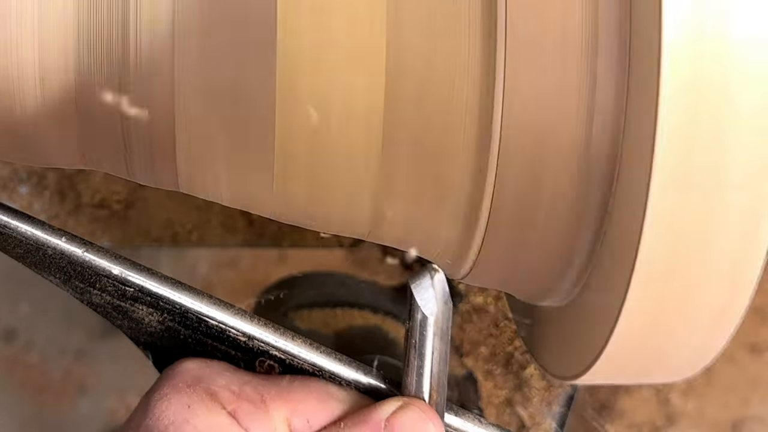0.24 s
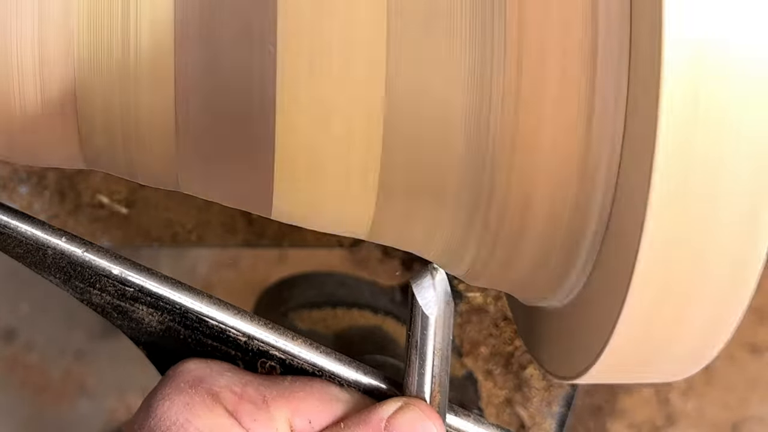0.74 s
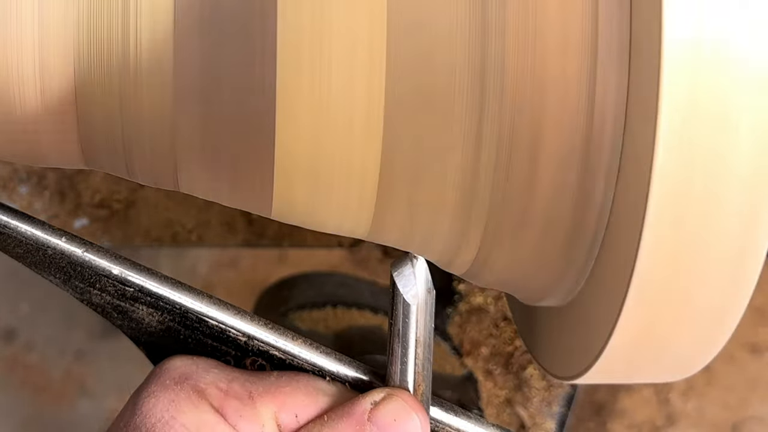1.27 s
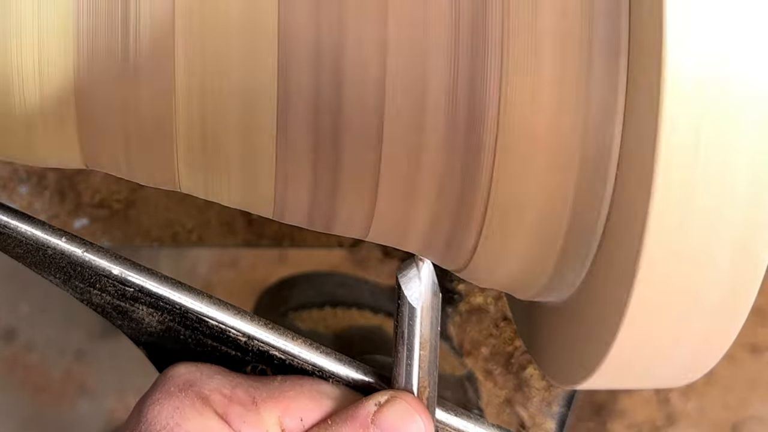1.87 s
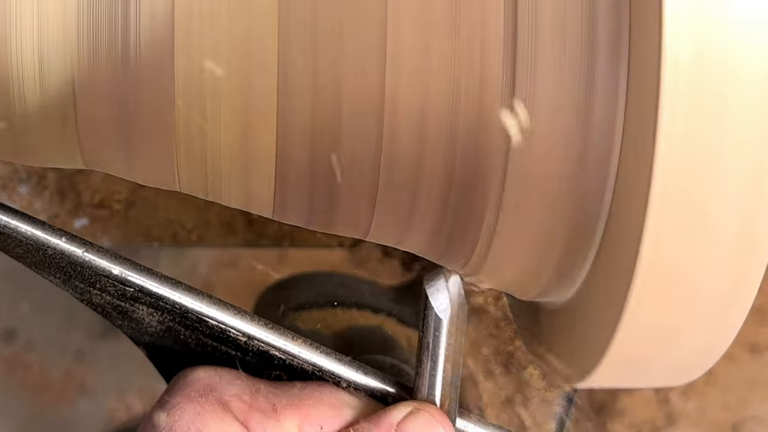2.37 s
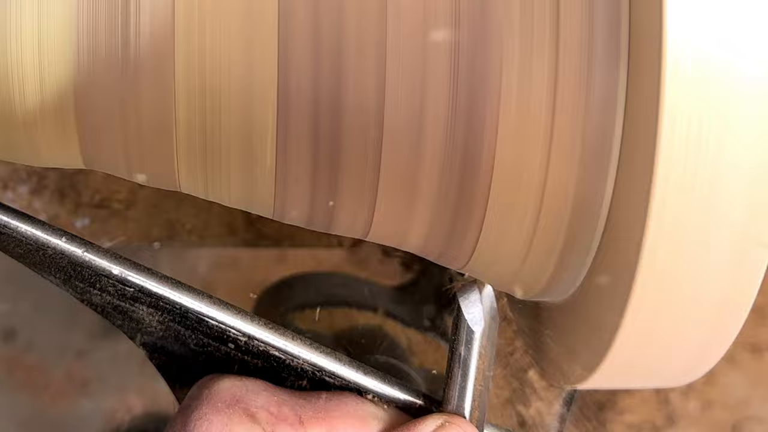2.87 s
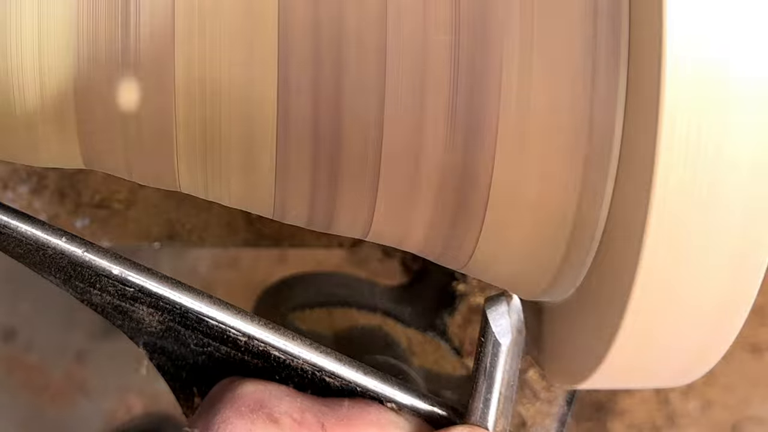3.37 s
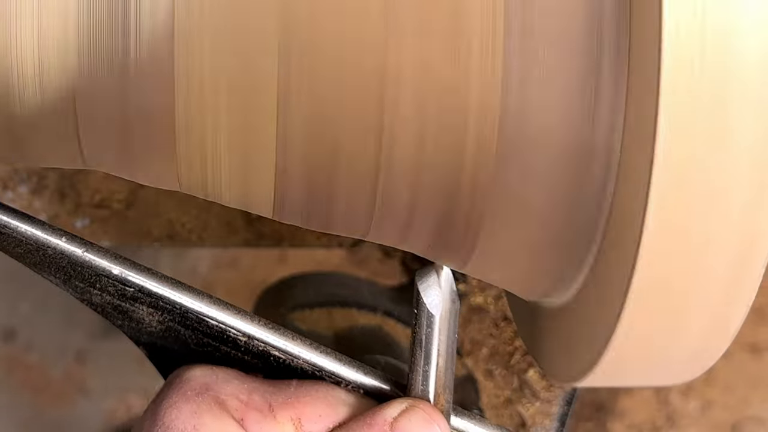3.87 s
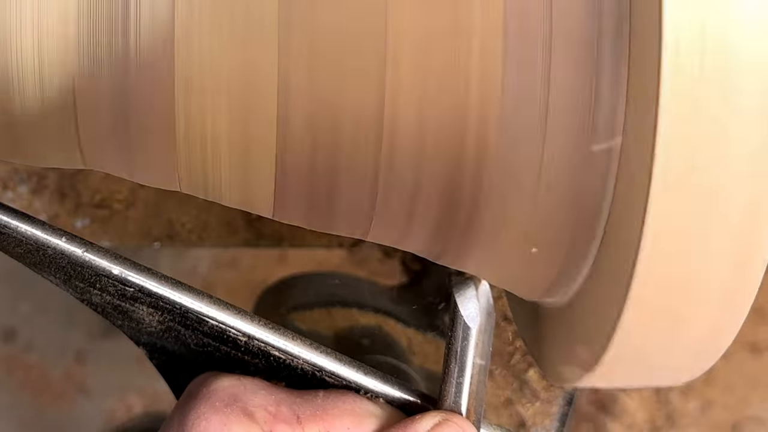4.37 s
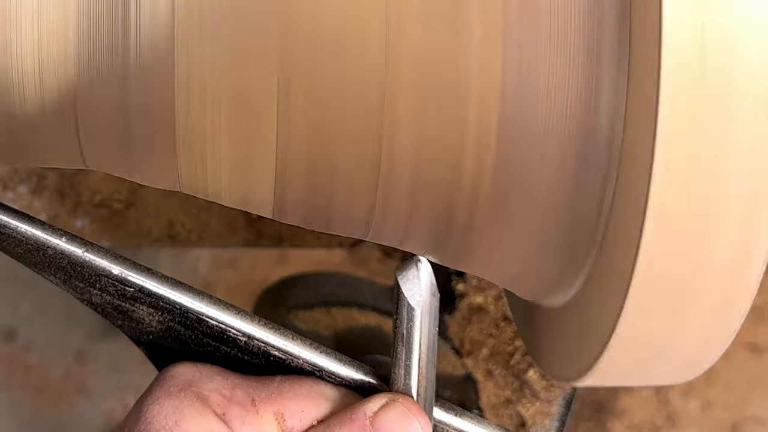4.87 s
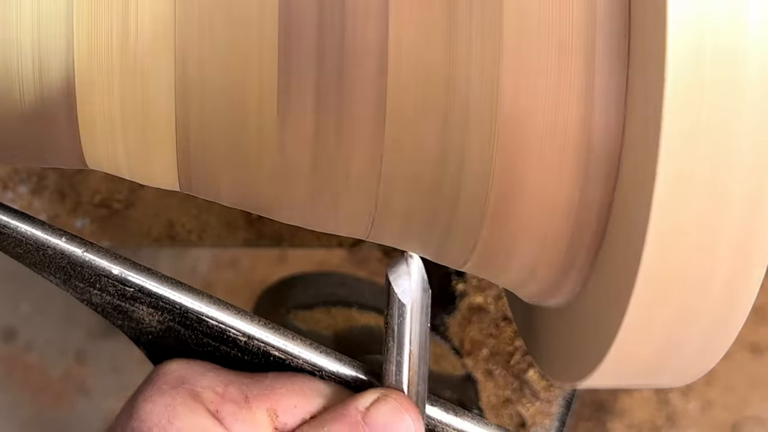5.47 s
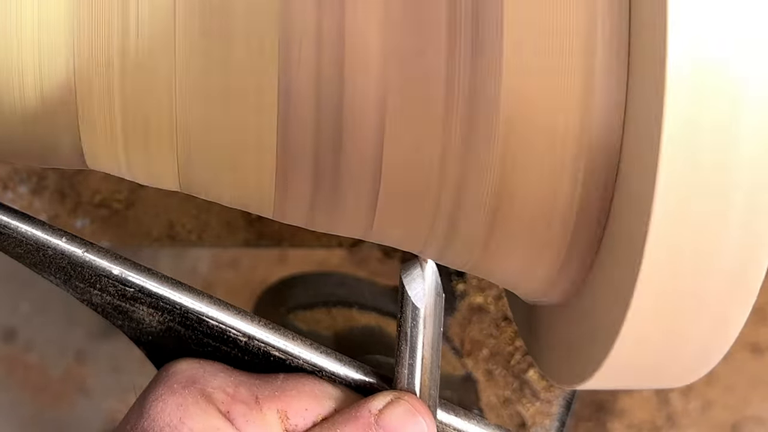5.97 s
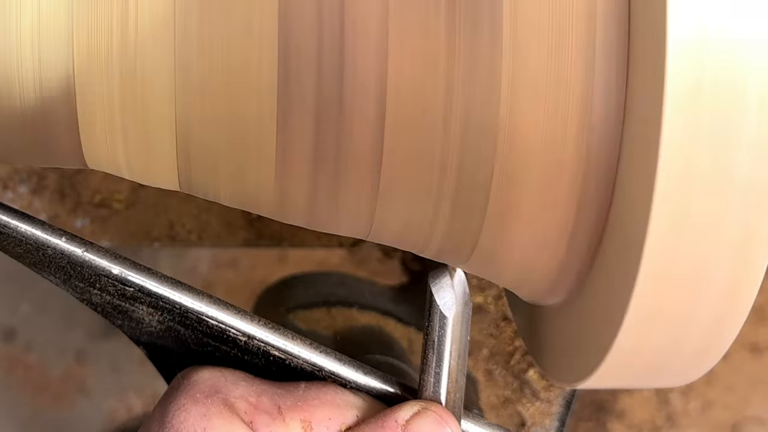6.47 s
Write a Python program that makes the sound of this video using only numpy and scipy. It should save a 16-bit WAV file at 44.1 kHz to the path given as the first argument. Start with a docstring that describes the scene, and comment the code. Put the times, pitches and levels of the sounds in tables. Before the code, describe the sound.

Close, dry woodturning: short scraping bursts, then longer buzzing cuts over a low lathe hum, with occasional steel knocks and brief chatter.

```python
"""A lathe idles close by: headstock rumble, bearing hiss (shaped noise) and thin drive whine (wavering sines).
A gouge then takes light passes, short and long, over a wooden bowl blank, the lathe alone between them.
Each pass lands with a jolt, leans in and lifts; random fibre snaps hiss and ring the blank's resonances.
The cut throbs with every turn of high side and end grain, chatters at times, and a glue seam ticks.
Now and then the steel shaft knocks and rings; the last pass is still cutting at the end."""
import sys
import numpy as np
from scipy import signal
from scipy.fft import rfft, irfft
from scipy.io import wavfile

SR = 44100
rng = np.random.default_rng(int(sys.argv[2]) if len(sys.argv) > 2 else 0)


def unload_audio(sound):
    """Save the sound as a 16-bit wav file, at the path given as the first command line argument."""
    columns = np.transpose(np.atleast_2d(sound))
    # keep every value between -1 and 1, then stretch to whole-number steps
    steps = np.round(np.clip(columns, -1, 1) * 32767)
    wavfile.write(sys.argv[1], SR, steps.astype(np.int16))


N = 297234
TIME = np.arange(N) / SR
BINS_HZ = np.fft.rfftfreq(4096, 1 / SR)


def undb(db):
    """Decibels to gain."""
    return 10 ** (np.asarray(db) / 20)


def unit(x):
    """Scale to rms 1."""
    return x / np.std(x)


def walk(rate):
    """Smooth random curve: about `rate` swings/s, spread 1."""
    count = 8192
    hz = np.fft.rfftfreq(count, TIME[-1] / count)
    spectrum = rfft(rng.standard_normal(count)) / (1 + (hz / rate) ** 4)
    slow = unit(irfft(spectrum))
    return np.interp(TIME, np.linspace(0, TIME[-1], count), slow)


def curves(table):
    """Columns of a (t/s, values ..) table at every sample."""
    s, *columns = np.transpose(table)
    return [np.interp(TIME, s, column) for column in columns]


def slope(points):
    """Gain in dB at every bin, from (f/Hz, gain/dB) points on a log frequency axis."""
    hz, db = np.transpose(points)
    return np.interp(np.log(BINS_HZ + 1), np.log(hz), db)


def response(db):
    """Minimum-phase impulse response with this gain in dB, by folding the cepstrum."""
    cepstrum = irfft(db * np.log(10) / 20)
    half = len(cepstrum) // 2
    cepstrum[1:half] *= 2
    cepstrum[half + 1:] = 0
    return irfft(np.exp(rfft(cepstrum)))


def ring(x, h):
    """Convolve with an impulse response scaled to unit energy."""
    return signal.fftconvolve(x, h / np.linalg.norm(h))[:N]


def band(x, low_hz, high_hz):
    """Band-pass with moderately steep edges, kept below Nyquist."""
    edges_hz = [low_hz, min(high_hz, SR / 2 - 100)]
    return signal.sosfilt(signal.butter(3, edges_hz, "band", fs=SR, output="sos"), x)


# slow swell of the rumble: t/s, level/dB
RUMBLE_SWELL = [(0, -48), (1.4, -48), (3, -49.5), (4.7, -49.5), (5.5, -47.5), (6.74, -48)]
# headstock rumble spectrum: f/Hz, relative gain/dB
RUMBLE_SPECTRUM = [(20, -18), (45, -10), (85, -8), (140, -2), (205, 0.5), (250, -1.5), (300, 0),
                   (420, -8.5), (520, -7), (640, -13), (740, -13.5), (880, -18), (1500, -48)]
# bearing hiss spectrum: f/Hz, relative gain/dB
BEARING_SPECTRUM = [(500, -21.5), (900, -6.5), (1100, -1), (1650, -4), (2400, -11.5), (3900, -14.5),
                    (4800, -20), (5500, -17.5), (7800, -21), (10000, -31), (15000, -37)]
# motor drive whine: f/Hz, peak level/dB
DRIVE_WHINE = [(10799, -83), (11230, -89), (11531, -94)]


def lathe(bearings_db):
    """Shaped noise for lumpy headstock rumble and restless bearings; sines of wandering pitch for the drive."""
    rumble_db = curves(RUMBLE_SWELL)[0] + 1.18 * walk(rate=21)
    rumble = ring(rng.standard_normal(N), response(slope(RUMBLE_SPECTRUM))) * undb(rumble_db)
    hiss_db = bearings_db + 1.3 * walk(rate=25)
    bearings = ring(rng.standard_normal(N), response(slope(BEARING_SPECTRUM))) * undb(hiss_db)
    whine = np.zeros(N)
    for hz, db in DRIVE_WHINE:
        turns = np.cumsum(hz + 22 * walk(rate=40)) / SR
        whine += undb(db) * np.sin(2 * np.pi * turns)
    return rumble + bearings + whine


def workshop(x, t60_s, wet_db):
    """Adds a faint, short, dull echo from bench and walls: decaying, low-passed noise."""
    t = TIME[:SR // 2]
    gap_s = .004
    tail = rng.standard_normal(len(t)) * undb(-60 * t / t60_s) * (t > gap_s)
    tail = signal.sosfilt(signal.butter(1, 6000, fs=SR, output="sos"), tail)
    return x + undb(wet_db) * ring(x, tail)


# steel knocking against wood: t/s, level of the scrape/dB
SHAFT_KNOCKS = [(.314, -41), (0.828, -33), (0.845, -28), (1.317, -36.5), (3.695, -48), (5.765, -38)]


def knocks(ring_hz, width_hz, decay_s):
    """Each knock is a decaying noise scrape that rings the steel shaft of the gouge."""
    push = np.zeros(N)
    for s, db in SHAFT_KNOCKS:
        push += undb(db) * (TIME >= s) * np.exp(-np.abs(TIME - s) / decay_s)
    shaft_db = -10 * np.log10(1 + (2 * (BINS_HZ - ring_hz) / width_hz) ** 2)
    return ring(push * rng.standard_normal(N), response(shaft_db))


def fibres(per_second, spread_db, rub_db, flutter_db):
    """Fibres snap at random over the smooth rub of the bevel, in flurries as the shaving curls and breaks."""
    snaps = (rng.random(N) < per_second / SR) * rng.standard_normal(N)
    size = undb(spread_db * np.minimum(rng.exponential(size=N), 5))
    rub = undb(rub_db) * rng.standard_normal(N)
    grain = unit(unit(snaps * size) + rub)
    return grain * undb(flutter_db * walk(rate=105))


def seam(turns, tick_db):
    """A hard glue seam in the blank knocks the edge as each turn completes: band-passed clicks."""
    hits = np.flatnonzero(np.diff(np.floor(turns)) > 0)
    ticks = np.zeros(N)
    ticks[hits] = undb(tick_db)
    return band(ticks, 930, 1800)


def boost(x, hz, width_hz, db):
    """Raise or lower one resonance by a level that may move in time."""
    return x + (undb(db) - 1) * signal.lfilter(*signal.iirpeak(hz, hz / width_hz, fs=SR), x)


# blank, gouge and tool rest, with fine ripples from near reflections off the bench above 6.8 kHz: f/Hz,
# width/Hz, mean gain/dB
BODY_RESONANCES = [(990, 95, 3), (1466, 91, -1), (1650, 64, 0.5), (1860, 22, 4.5), (2117, 80, 4.5),
                   (2268, 42, 5), (2490, 48, 2.5), (2857, 78, 2.5), (2773, 100, 6), (3305, 100, 4.5),
                   (4430, 140, 2.5), (4770, 330, -0.5), (5860, 67, 6), (6890, 160, 3.5), (7980, 164, 6),
                   (8410, 140, 4), (9070, 160, 2.5), (11630, 300, 3.5)]
# blank low, blank upper, gouge shaft: f/Hz, width/Hz
GRIPPED_MODES = [(1395, 250), (1740, 77), (4740, 230)]


def resonate(x, modes_db, wander_db, grip_db):
    """Resonances are fed more or less strongly as the point of contact wanders and the grip changes."""
    for hz, width_hz, db in BODY_RESONANCES:
        x = boost(x, hz, width_hz, db + wander_db * walk(rate=20))
    for (hz, width_hz), db in zip(GRIPPED_MODES, modes_db):
        x = boost(x, hz, width_hz, db + grip_db * walk(rate=7.2))
    return x


# depth of the steady throb and how much it wavers, before the weights of its harmonics
THROB_DB, THROB_WAVER_DB = 0.8, 1
# bouncing bouts: worst at t/s, build-up/s, extra throb/dB, extra bite/dB
CHATTER_BOUTS = [(.261, 0.022, 4.5, 8), (.316, 0.029, 5, 1.5), (0.363, 0.066, 0.5, 8),
                 (.765, 0.061, 3, 7.5), (.84, 0.056, 3.5, 3.5), (1.45, 0.022, 2.5, 9.5),
                 (1.585, 0.06, 2.5, 0), (2.24, 0.12, 2, 3.5), (3.5, 0.084, 2.5, 1)]
CHATTER_SETTLES_S = 0.057


def chatter():
    """Bouncing builds up and settles, deepening throb and bite; returns both in dB."""
    throb_db = THROB_DB + THROB_WAVER_DB * walk(rate=3.1)
    dig_db = np.zeros(N)
    for s, build_s, bounce_db, bite_db in CHATTER_BOUTS:
        swell = np.interp(TIME, [s - build_s, s, s + CHATTER_SETTLES_S], [0, 1, 0])
        throb_db += bounce_db * np.sqrt(swell)
        dig_db += bite_db * swell
    return throb_db, dig_db


# passes: touch/s, lift/s, release/s, full level/dB before feed, lighter at touch by/dB,
# lean-in time constant/s, gain of the blank's low mode/dB
GOUGE_PASSES = [(0.248, 0.479, 0.047, -36.5, 10.5, 0.05, -0.5), (0.726, 1.085, 0.039, -37, 11, 0.057, 1),
                (1.316, 1.59, 0.037, -36, 14, 0.1, 5.5), (1.813, 3.509, 0.022, -35.5, 11, 0.078, 1.9),
                (3.696, 3.699, .07, -43.5, 1, .05, 0), (3.753, 4.655, .039, -39, 13.5, 0.036, 3.5),
                (5.01, 5.258, 0.083, -36.5, 11, 0.15, 3), (5.544, 5.631, 0.031, -46, 0.5, 0.1, 6.5),
                (5.768, 6.8, .03, -37.5, 5, 0.085, 1)]
# hand feed, one list per long pass: t/s, extra level/dB, extra bite/dB
HAND_FEED = [
    [(2.33, -2, 0), (2.48, 1, -.5), (2.63, 0.1, -5.5), (2.68, 1.5, 1.5), (2.88, 0.3, 0.5), (3.02, -3.2, 0),
     (3.25, -4, -2.3), (3.48, -7, -5.5)],
    [(3.9, .6, -0.5), (4.03, -0.6, -1.1), (4.29, 1.15, -0.5), (4.4, 1.5, 2), (4.5, 2.5, -0.3),
     (4.66, 3, -5)],
    [(5.9, 0.5, -1.1), (6.1, 0.5, 2), (6.28, 0.9, 0), (6.4, 0.5, -3.5), (6.74, 0.6, 0)],
]
# upper blank mode, shaft: gain free at touch/dB, gain bedded in/dB
MODE_BEDDING = [(1.8, -9.5), (5, -3.5)]
BEDDING_S = 1
# level falls by CLEAR_DB within CONTACT_S before touch, and within the release time after lift
CONTACT_S, CLEAR_DB = 0.0087, 32
JOLT_DB, JOLT_S = 3.5, .008
# bite: body of the wood over the hiss, growing with level
BITE_DB, BITE_AT_LEVEL_DB, BITE_DB_PER_DB = 0.86, -37.5, 0.58
# at first only the edge scrapes, with less bite
SCRAPE_DB, SCRAPE_S = 2, 0.07


def passes():
    """Passes land, lean in, follow the feed and lift ever faster; returns level, bite, main mode gains in dB."""
    gain, bite_db, low_db, age_s = np.zeros((4, N))
    for touch, lift, release_s, full_db, light_db, lean_s, mode_db in GOUGE_PASSES:
        since = np.maximum(TIME - touch, 0)
        level_db = full_db - light_db * np.exp(-since / lean_s)
        deeper_db = 0
        for feed in HAND_FEED:
            if touch < feed[0][0] < lift:
                extra_db, deeper_db = curves(feed)
                level_db = level_db + extra_db
        approach = np.maximum(touch - TIME, 0) / CONTACT_S
        departure = (np.maximum(TIME - lift, 0) / release_s) ** 2
        jolt_db = JOLT_DB * np.exp(-since / JOLT_S)
        gain += undb(level_db + jolt_db - CLEAR_DB * (approach + departure))

        pass_bite_db = BITE_DB + BITE_DB_PER_DB * (level_db - BITE_AT_LEVEL_DB) + deeper_db
        pass_bite_db = pass_bite_db - SCRAPE_DB * np.exp(-since / SCRAPE_S)
        begun = TIME > touch - CONTACT_S
        bite_db[begun] = pass_bite_db[begun]
        low_db[begun] = mode_db
        age_s[begun] = since[begun]
    free = np.exp(-age_s / BEDDING_S)
    upper_db = [bedded_db + (free_db - bedded_db) * free for free_db, bedded_db in MODE_BEDDING]
    return 20 * np.log10(gain + 1e-6), bite_db, [low_db, *upper_db]


# spindle speed, sagging under load: t/s, turns per second
SPINDLE_SPEED = [(0, 54.35), (2.8, 54.3), (3.05, 55.6), (3.4, 54.6), (4.1, 54.2), (4.35, 52.4), (4.7, 55),
                 (5.2, 54.6), (5.8, 54), (6.74, 53.7)]
HIGH_SIDE_TURNS = .18
# wood body, chips, scraping edge, fine dust: low f/Hz, high f/Hz, snaps per second, relative level/dB,
# share of the bite, flutter/dB, end grain swing/dB (before the riding factor)
CUT_PARTS = [(203, 2210, 1500, 0.87, 1.0, 1.0, 8.5), (2267, 3470, 2100, -0.5, 0.78, 1.5, 3),
             (3620, 6630, 7000, 0, 0.51, 1.45, 3.5), (6560, 24700, 13000, 1.5, 0.032, 0.5, 2)]
# broad colour of the cut: f/Hz, relative gain/dB
SHAVING_COLOUR = [(300, -33.5), (650, -17), (900, -10), (1170, -9.5), (1350, 0.5), (1800, 1), (2400, -3),
                  (3600, -5.5), (4700, -3), (6500, -9.5), (9000, -12), (10500, -14), (12700, -16.5),
                  (14300, -15.5)]
# narrow dips and bumps in the colour of the cut: f/Hz, width/Hz, gain/dB
COLOUR_DETAILS = [(1530, 94, -4), (2655, 190, -3), (2840, 120, 0.5), (7700, 160, 3)]
# uneven tearing of the shaving shakes the whole cut
TEARING_DB, TEARING_SWINGS_PER_S = .4, 75


def cutting(end_grain_turns, bounce_db):
    """Fibres snap under the gouge, pressed once a turn by the high side and once by the end grain."""
    level_db, bite_db, modes_db = passes()
    throb_db, dig_db = chatter()
    bite_db = bite_db + dig_db
    turns = np.cumsum(curves(SPINDLE_SPEED)[0]) / SR - HIGH_SIDE_TURNS
    angle = 2 * np.pi * turns
    high_side = 1.16 * np.cos(angle) + 0.24 * np.cos(2 * angle)
    press_db = level_db + throb_db * high_side + 0.25 * np.cos(2 * angle)
    press_db = press_db + TEARING_DB * walk(rate=TEARING_SWINGS_PER_S)

    # end grain and seam drum on the wood and lift the hiss a little, unless the gouge bounces clear
    riding = np.clip(0.5 - (throb_db / bounce_db) ** 2, 0, 1)
    end_grain = riding * np.cos(angle - 2 * np.pi * end_grain_turns)
    seam_turns = turns - end_grain_turns + .04 * walk(rate=16)
    force = seam(seam_turns, tick_db=18.0) * riding * undb(level_db + 0.63 * bite_db)

    # a deeper bite shakes the body of the wood, a light touch mostly hisses
    for low_hz, high_hz, per_second, db, share, flutter_db, swing_db in CUT_PARTS:
        grain = fibres(per_second, spread_db=-2.2, rub_db=4.5, flutter_db=flutter_db)
        part_db = db + press_db + share * bite_db + swing_db * end_grain
        force = force + band(grain, low_hz, high_hz) * undb(part_db)

    colour_db = slope(SHAVING_COLOUR)
    for hz, width_hz, db in COLOUR_DETAILS:
        colour_db = colour_db + db / (1 + (2 * (BINS_HZ - hz) / width_hz) ** 2)
    return resonate(ring(force, response(colour_db)), modes_db, wander_db=1.5, grip_db=1.5)


def scene():
    """Tool with room echo plus lathe without, the same in both channels."""
    machine = lathe(bearings_db=-55.0)
    shaft = knocks(ring_hz=4770, width_hz=250, decay_s=0.004)
    tool = cutting(end_grain_turns=.47, bounce_db=4.5) + shaft
    mono = workshop(tool, t60_s=0.13, wet_db=-23.0) + machine
    return np.array([mono, mono])


TOP_HZ = 15700


def record(dry):
    """Low-pass that rounds off the top, then a steep cut."""
    soft = signal.sosfilt(signal.butter(12, 15200, fs=SR, output="sos"), dry)
    return signal.sosfilt(signal.ellip(10, .2, 80, TOP_HZ, fs=SR, output="sos"), soft)


dry = scene()
out = record(dry)
unload_audio(out)
```